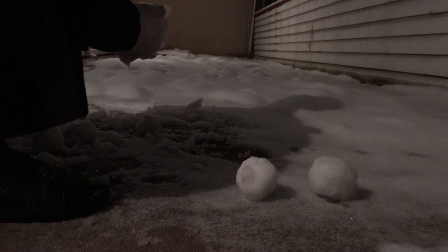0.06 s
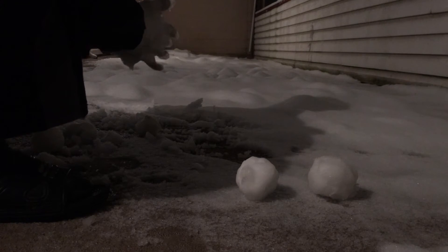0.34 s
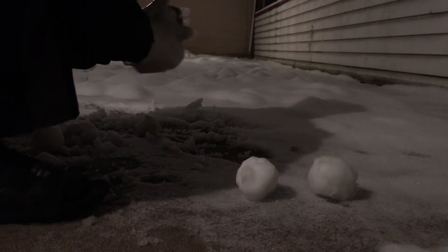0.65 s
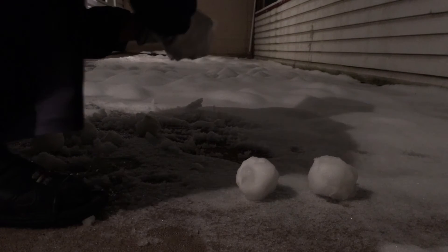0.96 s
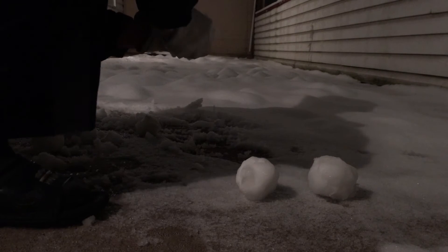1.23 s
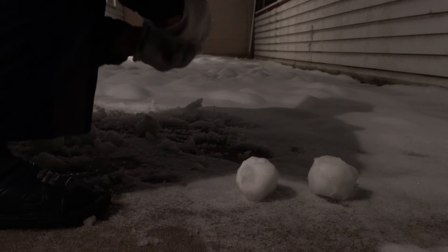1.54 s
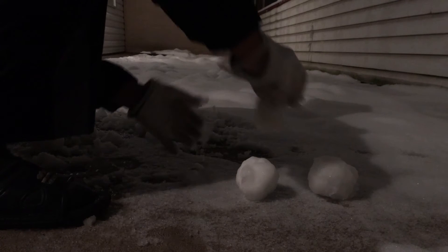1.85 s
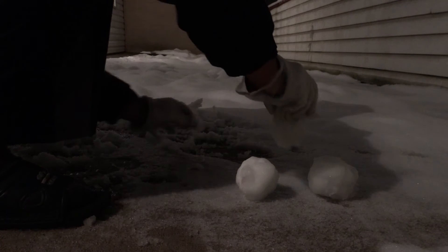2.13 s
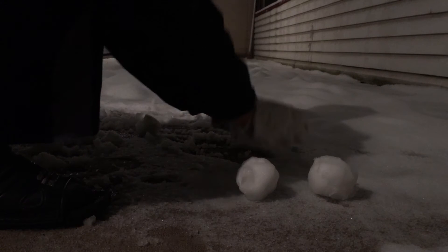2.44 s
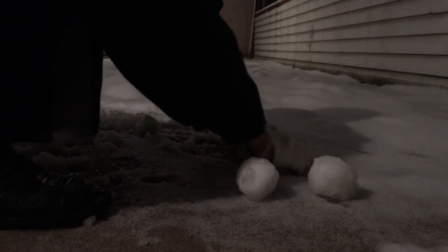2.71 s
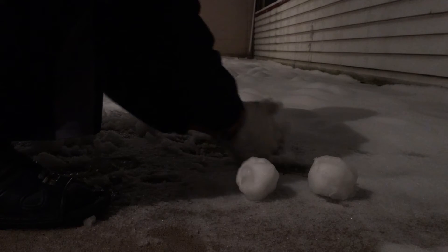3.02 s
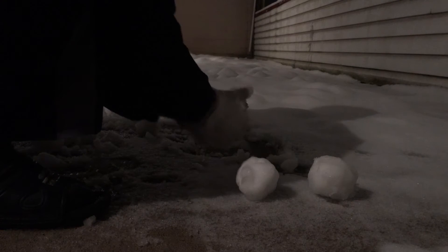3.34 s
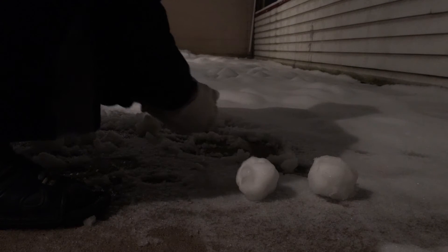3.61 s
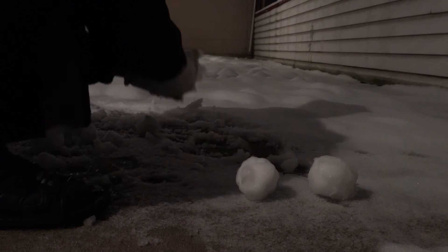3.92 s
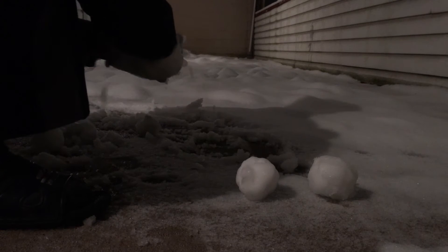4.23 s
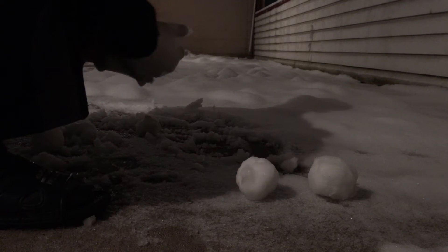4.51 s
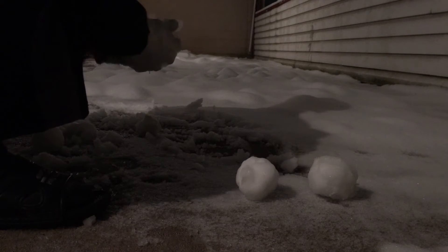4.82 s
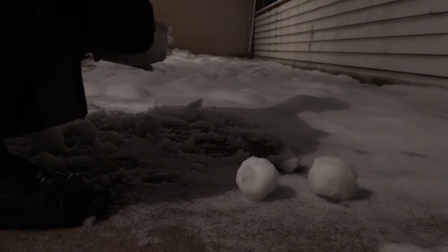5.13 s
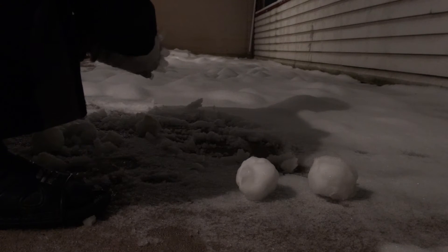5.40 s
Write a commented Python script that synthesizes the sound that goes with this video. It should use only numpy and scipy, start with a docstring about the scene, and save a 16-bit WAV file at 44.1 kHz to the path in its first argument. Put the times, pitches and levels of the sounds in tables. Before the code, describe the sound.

A steady low hum of distant machinery fills a quiet yard. From the start, gloves rustle and fizz over wet snow close by, with small crunches as clumps give way. At about 1.0 and 1.3 seconds, two firm, hollow pats on a snowball stand out as the loudest sounds, with a faint, brief echo from the house walls. Crumbs fall with tiny ticks from 1.7 to 2.1 seconds as the rubbing eases. A soft thud and crunch come at 2.6 seconds, then fingers rake through the crust in two rasping scoops, near 2.9 and 3.2 seconds, the second quieter. The snow is pressed on with a dull thump at 3.7 seconds and a crunchy one at 4.1. Soft, grainy glove rubbing with scattered crackles continues until the end, at about 5.5 seconds.

```python
"""Gloved hands pack wet snow in a quiet yard at night, over a low hum of far machinery.
From the start the gloves rustle and fizz over the snow and clumps give way. Two hard pats on a snowball
(0.95 s, 1.3 s) ring the cupped hands, and the house walls answer. Crumbs fall as the hands part.
The hands reach down (2.6 s), rake up two scoops (2.9 s, 3.2 s), press them on (3.7 s, 4.1 s)
and keep rubbing to the end."""
import sys
import numpy as np
from scipy import signal
from scipy.fft import rfft, irfft, next_fast_len
from scipy.io import wavfile
from scipy.ndimage import uniform_filter1d, map_coordinates

SR = 44100
rng = np.random.default_rng(int(sys.argv[2]) if len(sys.argv) > 2 else 0)


def bounce(signal):
    """Save signal as a 16-bit WAV file at the path given by the first command-line argument."""
    frames = np.transpose(np.atleast_2d(signal))
    limited = np.clip(frames, -1, 1)
    pcm = np.round(limited * 32767).astype(np.int16)
    wavfile.write(sys.argv[1], SR, pcm)


N = 245195


def amp(db):
    """Decibels to gain."""
    return 10 ** (np.asarray(db) / 20)


def unit(x):
    """Scale to rms 1."""
    return x / np.sqrt(np.mean(x ** 2) + 1e-20)


def along(points, hz):
    """Interpolate (freq_hz, value) points on a log frequency axis."""
    freqs_hz, values = np.transpose(points)
    return np.interp(np.log(hz + 1), np.log(freqs_hz + 1), values)


def wobble(rate_hz):
    """Smooth random curve, rate_hz knots a second."""
    knots = rng.standard_normal(int(N * rate_hz / SR) + 4)
    return map_coordinates(knots, [np.arange(N) * rate_hz / SR])


def swell(t, half_s):
    """Gaussian rise and fall round t = 0."""
    return np.exp(-.5 * (t / half_s) ** 2)


def filtered(x, response):
    """Apply a frequency response."""
    size = next_fast_len(len(x) + 8192)
    return irfft(rfft(x, size) * response(np.fft.rfftfreq(size, 1 / SR)), size)[:len(x)]


def coloured(x, spectrum):
    """Shape x by a spectrum, at rms 1."""
    return unit(filtered(x, lambda hz: amp(along(spectrum, hz))))


def resonant(x, centre_hz, q):
    """One broad causal resonance."""
    width_hz = centre_hz / q
    return filtered(x, lambda hz: 1j * hz * width_hz / (centre_hz ** 2 - hz ** 2 + 1j * hz * width_hz))


def grains(count, rate_hz, spread_db, smooth_db):
    """Tiny fractures of random size over the smooth hiss of sliding."""
    breaks = rng.random(count) < rate_hz / SR
    sizes = amp(spread_db * np.minimum(rng.exponential(size=count), 3))
    signs = rng.choice([-1, 1], count)
    return unit(unit(breaks * sizes * signs) + amp(smooth_db) * rng.standard_normal(count))


def add(track, start_s, sound):
    """Mix a sound into the track."""
    start = max(round(start_s * SR), 0)
    track[start:start + len(sound)] += sound[:N - start]


def hum():
    """Far machinery: low rumble and a slightly unsteady mains line."""
    # freq_hz, level_db
    rumble_spectrum = [(20, -13), (40, -5), (55, -1.5), (75, 4), (100, -2), (135, 2), (180, -6.5),
                       (250, -11), (400, -19.5), (800, -23.5), (2000, -41.5), (6000, -68), (15000, -64)]
    rumble = amp(-47.5 + 1.1 * wobble(5.7)) * coloured(rng.standard_normal(N), rumble_spectrum)
    mains_hz = 120 + .7 * wobble(3)
    mains = amp(-53 + 1.5 * wobble(4)) * np.sin(2 * np.pi * np.cumsum(mains_hz) / SR)
    return rumble + mains


def yard(x):
    """House walls answer a moment later; the snow cover soaks up all but the bass."""
    # freq_hz, t60_s
    decay_times = [(80, 0.36), (200, 0.42), (330, 0.11), (2000, 0.043), (10000, 0.072)]
    delay_s, soak_hz = .042, 350
    hz, t, noise = signal.stft(rng.standard_normal(SR // 2), SR, nperseg=512)
    decay = amp(-60 * t / along(decay_times, hz)[:, None])
    tail = signal.istft(noise * decay, SR, nperseg=512)[1]
    tail = filtered(tail / np.linalg.norm(tail), lambda f: 1 / (1 + 1j * f / soak_hz))
    answer = np.zeros(N)
    add(answer, delay_s, signal.fftconvolve(x, tail)[:N])
    return answer


def crumbs():
    """Large crumbs land or snap with a tick; small ones drop as the hands part."""
    # start_s, peak_db, pitch_hz
    large = [(1.678, -36.5, 5000), (1.807, -34, 5900), (1.851, -36, 3640), (1.936, -33, 3380),
             (1.959, -37.5, 3700), (2.115, -40.5, 9000), (2.55, -28, 6100), (3.501, -26, 8700),
             (5.383, -35, 8050)]
    small = [(1.7 + .3 * when, -47 + 10 * (size - .5), 7500 * 2 ** (pitch - .5))
             for when, size, pitch in rng.random(size=(6, 3))]
    t60_s = .011
    out, t = np.zeros(N), np.arange(SR // 20) / SR
    for start_s, peak_db, pitch_hz in large + small:
        tick = resonant(rng.standard_normal(len(t)) * amp(-60 * t / t60_s), pitch_hz, q=.9)
        add(out, start_s, amp(peak_db) * tick / np.abs(tick).max())
    return out


def crunches():
    """Each clump collapses in a short swell of fractures."""
    # middle_s, level_db, half_length_s, centre_hz
    clumps = [(0.392, -36, 0.0033, 7000), (0.648, -46, 0.0035, 1400), (0.672, -37.5, 0.011, 6960),
              (0.757, -33, 0.016, 5370), (0.851, -34.5, 0.014, 530), (0.852, -34, 0.015, 1900),
              (0.86, -29.5, 0.0028, 2760), (1.104, -36.5, 0.0095, 4260), (1.322, -46, 0.033, 3400),
              (1.531, -42, 0.011, 5000), (1.718, -40, 0.0087, 4500), (2.585, -32, 0.0053, 1060),
              (2.588, -37.5, 0.013, 9200), (2.62, -39, 0.01, 8000), (2.825, -35.5, 0.012, 493),
              (2.911, -35, 0.043, 13000), (3.046, -38, .009, 6030), (3.208, -36.5, .006, 1370),
              (3.212, -40, .006, 9000), (3.261, -37, 0.0083, 4030), (3.518, -39, 0.014, 5060),
              (3.933, -35.5, 0.019, 3040), (4.096, -36, 0.0041, 637), (4.1, -30.5, 0.0025, 5900),
              (4.109, -31, 0.013, 6100), (4.536, -35, 0.01, 7000), (5.069, -36.5, 0.009, 4700),
              (5.16, -40.5, 0.0067, 4700)]
    out, t = np.zeros(N), np.arange(SR // 5) / SR - .1
    for middle_s, level_db, half_s, centre_hz in clumps:
        fractures = grains(len(t), rate_hz=4000, spread_db=3.5, smooth_db=-2)
        q = 2.2 * (1000 / centre_hz) ** .83  # big, low clumps ring more
        crunch = unit(resonant(fractures, centre_hz, q))
        add(out, middle_s + t[0], amp(level_db - 6) * swell(t, half_s) * crunch)
    return out


def crackle():
    """Larger wet crystals pop under the glove, each at its own pitch."""
    rate_hz, decay_cycles = 70, 2
    when, pitch, size = rng.random((int(rate_hz * N / SR), 3)).T[:, :, None]
    pitch_hz = 2500 * 6 ** pitch
    offsets = np.arange(SR // 200)
    cycles = pitch_hz * offsets / SR
    pops = amp(6.5 + 10 * size ** 3) * np.exp(-cycles / decay_cycles) * np.sin(2 * np.pi * cycles)
    positions = (when * N).astype(int) + offsets
    return np.bincount(positions.ravel(), pops.ravel(), N)[:N]


def friction(spectrum, rate_hz, spread_db, smooth_db):
    """Grainy rub whose colour shifts as the contact moves over cloth and snow."""
    patch_db = 1.9
    rub = coloured(grains(N, rate_hz, spread_db, smooth_db), spectrum)
    frames = signal.stft(rub, nperseg=512)[2]
    patches = rng.standard_normal(frames.shape)
    for _ in range(2):
        patches = uniform_filter1d(uniform_filter1d(patches, size=6, axis=0), size=14, axis=1)
    return unit(signal.istft(frames * amp(patch_db * unit(patches)), nperseg=512)[1][:N])


def stroke(start_s, length_s):
    """Gain of one glove stroke: fastest and loudest halfway through."""
    attack_s, release_s, arch_db = .058, .032, 5.5
    t = np.arange(N) / SR - start_s
    attack = .5 * (1 + np.tanh(2 * t / attack_s))
    release = .5 * (1 + np.tanh(2 * (length_s - t) / release_s))
    return attack * release * amp(-arch_db * np.clip(2 * t / length_s - 1, -1, 1) ** 2)


def rubbing():
    """Gloves slide over snow: cloth friction, crystal fizz and the duller scrape of digging."""
    # start_s, length_s, rub_db, fizz_re_rub_db, scrape_re_rub_db
    strokes = [(-0.06, 0.23, -53.5, -1, -19), (0.264, 0.22, -53.5, -0.5, -6.5),
               (0.472, 0.098, -53.5, 1.5, -10), (0.602, 0.37, -50.5, -4.5, 0), (0.83, 0.17, -46.5, -4, -10),
               (0.975, 0.23, -51.5, -3, -5), (1.162, 0.48, -53, 1, -0.5), (1.669, 0.11, -51, 0.5, -23),
               (1.767, 0.24, -56.5, -5.5, -5), (1.996, 0.16, -65.5, -2, -8), (2.1, 0.15, -59.5, 0.5, -19),
               (2.225, 0.24, -52.5, -3, 1.5), (2.437, 0.28, -52.5, 0, 2), (2.694, 0.11, -45.5, 2.5, 5.5),
               (2.772, 0.23, -45.5, -7, 5), (2.979, 0.11, -46.5, 1, 5.5), (3.079, 0.23, -53, 1, 4),
               (3.403, 0.17, -48.5, 3, 0), (3.525, 0.14, -53, 5, 0), (3.643, 0.12, -61, 4, 4),
               (3.72, 0.18, -53, 0, -5), (3.886, 0.2, -54, 0, 0), (4.103, 0.27, -60, 0.5, -6),
               (4.277, 0.38, -51, 0, -12.5), (4.64, 0.12, -50.5, -0.5, -14),
               (4.764, 0.069, -52.5, -0.5, -15), (4.812, 0.16, -55.5, -4, -9), (4.951, 0.17, -51, 0, -14),
               (5.09, 0.18, -57, -2, -15), (5.281, 0.13, -50.5, -5, -18), (5.381, 0.17, -55, -4.5, -20)]
    # freq_hz, level_db
    cloth_spectrum = [(200, -18.5), (900, -3), (1400, -6), (2000, 2.5), (2700, 2), (3500, 0), (4200, -3),
                      (6000, -4.5), (8000, -13), (15000, -34)]
    fizz_spectrum = [(2000, -35), (5000, 1.5), (6800, 0), (9500, 2.5), (13000, -1), (15500, -1.5)]
    scrape_spectrum = [(120, 3), (300, -1), (480, -4.5), (750, -3.5), (1100, 0.5), (1550, -1), (2100, -14),
                       (3500, -13), (9000, -21)]
    idle_db = [[-67], [-72], [-65]]  # rub, fizz, scrape: the gloves never keep quite still
    power = np.zeros((3, N)) + amp(idle_db) ** 2
    for start_s, length_s, rub_db, fizz_re_rub_db, scrape_re_rub_db in strokes:
        gains = amp([[rub_db], [rub_db + fizz_re_rub_db], [rub_db + scrape_re_rub_db]])
        power += (gains * stroke(start_s, length_s)) ** 2
    rub_gain, fizz_gain, scrape_gain = np.sqrt(power)
    grip_db = wobble(70)  # the glove catches and slips
    cloth = rub_gain * amp(-.04) * friction(cloth_spectrum, rate_hz=2200, spread_db=4, smooth_db=.5)
    fizz = fizz_gain * amp(-.5) * friction(fizz_spectrum, rate_hz=900, spread_db=3.5, smooth_db=-.5)
    scrape = scrape_gain * amp(-1.5) * friction(scrape_spectrum, rate_hz=900, spread_db=-4.5, smooth_db=1)
    return amp(grip_db) * (cloth + fizz + scrape) + rub_gain * crackle()


def raking():
    """Fingers rasp through the crust; the gap under the closing glove rises in pitch."""
    # middle_s, half_length_s, level_db, middle_hz, rise_oct_per_s
    scoops = [(2.876, 0.063, -42.5, 1570, 1.4), (3.21, 0.056, -50.5, 1990, 5.5)]
    relative_width = .18
    out, t = np.zeros(N), np.arange(SR) / SR - .5
    for middle_s, half_s, level_db, middle_hz, rise_oct_per_s in scoops:
        fractures = grains(SR, rate_hz=1000, spread_db=11, smooth_db=1)
        hz, frame_s, frames = signal.stft(fractures, SR, nperseg=256)
        gap_hz = middle_hz * 2 ** (rise_oct_per_s * (frame_s - .5))
        detuning = (hz[:, None] / gap_hz - 1) / relative_width
        rasp = unit(signal.istft(frames / (1 + detuning ** 2), SR, nperseg=256)[1][:SR])
        add(out, middle_s + t[0], amp(level_db) * swell(t, half_s) * rasp)
    return out


def pats():
    """A pat pushes out air, rings the hollow of the hands, crushes the crust and sprays crumbs."""
    # start_s, push_db, push_hz, push_swell_s, ring_db, hardness_hz, crush_db, crush_s, spray_db
    contacts = [(0.9545, -14, 93.4, 0.017, -12.5, 1480, -21.5, 0.0024, -29),
                (1.3046, -26.5, 109.6, 0.029, -9, 1610, -18.5, 0.0015, -20),
                (2.5783, -28.5, 186, 0.015, -46, 260, -63, 0.0038, -38),
                (2.588, -36.5, 89, 0.037, -60, 150, -68, 0.003, -64),
                (3.709, -24.5, 209, 0.0057, -18, 170, -77, .003, -66),
                (4.0925, -30.5, 155, 0.0083, -38.5, 750, -34, 0.0041, -33)]
    # pitch_hz, level_db, t60_s
    hollow_modes = [(140, -14, .25), (190, 2, .09), (258, 2, .085), (348, -8, .06), (440, -4, .08),
                    (595, -11, .075), (675, -14, .065), (1470, -14, .045)]
    # freq_hz, level_db
    crush_spectrum = [(100, -7), (400, -4), (620, 22), (950, 5), (1400, 14.5), (2000, 6.5), (3000, 12.5),
                      (6000, 5.5), (10000, 0.5), (15500, -8.5)]
    spray_spectrum = [(100, 16.5), (550, 7.5), (900, -3), (1500, 3.5), (2100, -3), (3400, 0), (4700, -6.5),
                      (6000, -7), (9000, -17), (15500, -18)]
    air_lead_s, spray_t60_s = .0055, .19
    out, t = np.zeros(N), np.arange(SR // 2) / SR
    for start_s, push_db, push_hz, swell_s, ring_db, hardness_hz, crush_db, crush_s, spray_db in contacts:
        push_gain = amp(push_db) * (t / swell_s * np.exp(1 - t / swell_s)) ** 3
        add(out, start_s - air_lead_s, push_gain * np.sin(2 * np.pi * push_hz * t))
        # soft contact: weak upper modes, gentle onset
        ring = np.zeros(len(t))
        for pitch_hz, level_db, t60_s in hollow_modes:
            mode_gain = amp(ring_db + level_db - 4.5 - 60 * t / t60_s) / (1 + (pitch_hz / hardness_hz) ** 2)
            ring -= mode_gain * np.sin(2 * np.pi * pitch_hz * t)
        ring *= 1 - np.exp(-2 * hardness_hz * t)
        # dense crystal breaks merge into a short rush
        crush_gain = amp(crush_db) * t / crush_s * np.exp(1 - t / crush_s)
        crush = crush_gain * coloured(rng.standard_normal(len(t)), crush_spectrum)
        spray_gain = amp(spray_db - 60 * t / spray_t60_s) * (1 - np.exp(-t / (2 * crush_s)))
        spray = spray_gain * coloured(rng.standard_normal(len(t)), spray_spectrum)
        add(out, start_s, ring + crush + spray)
    return out


def scene():
    """Hands close by, the yard around them; mono."""
    blows = pats()
    return (blows + amp(-21.5) * yard(blows) + rubbing() + raking() + crunches() + crumbs() + hum())[None]


def record(dry):
    """Thin the deepest bass and cut the top treble steeply."""
    low_cut_hz, top_hz = 52, 15380
    thin = signal.sosfilt(signal.butter(2, low_cut_hz, "highpass", fs=SR, output="sos"), dry)
    return np.array([filtered(x, lambda hz: 1 / np.sqrt(1 + (hz / top_hz) ** 300)) for x in thin])


dry = scene()
out = record(dry)
bounce(out)
```